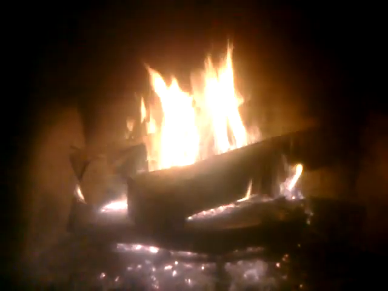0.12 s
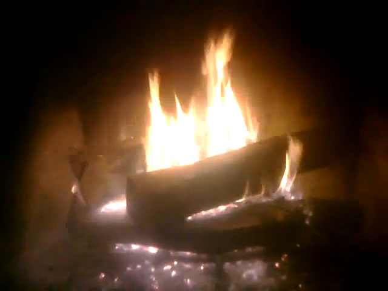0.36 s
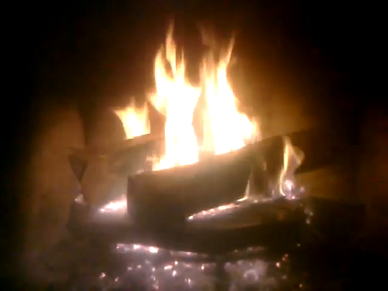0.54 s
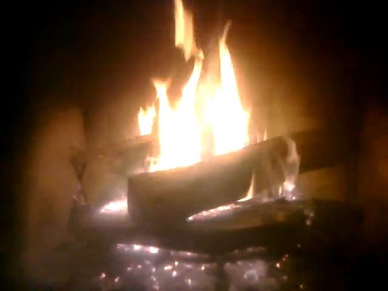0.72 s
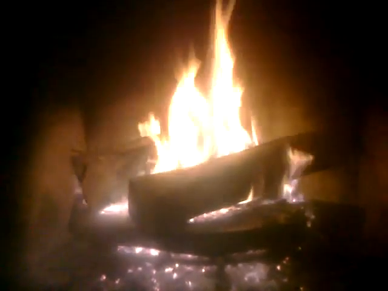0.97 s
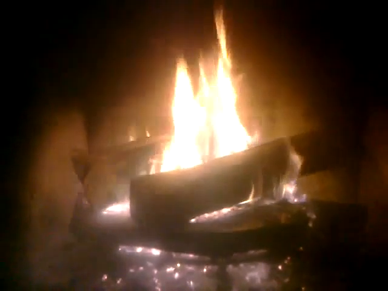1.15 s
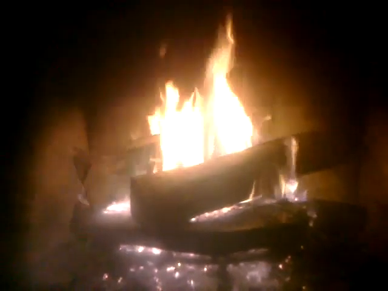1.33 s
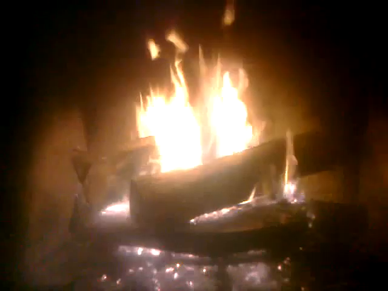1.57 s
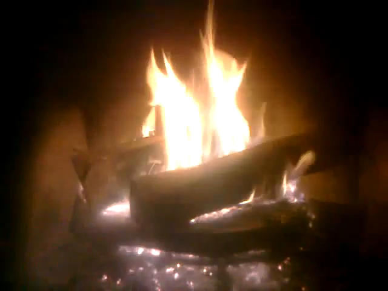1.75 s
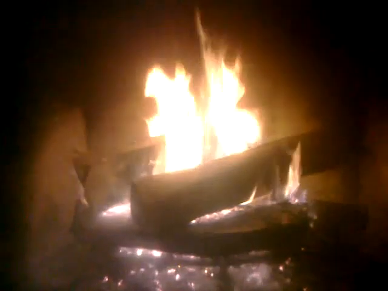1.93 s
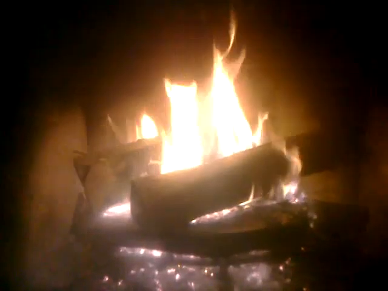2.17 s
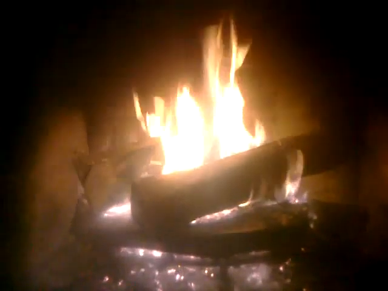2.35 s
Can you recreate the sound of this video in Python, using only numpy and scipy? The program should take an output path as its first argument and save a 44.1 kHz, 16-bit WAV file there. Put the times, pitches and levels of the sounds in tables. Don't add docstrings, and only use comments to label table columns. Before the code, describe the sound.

A wood fire crackles: a loud early snap over soft hissing flames, later small dull knocks.

```python
import sys
import numpy as np
from scipy import signal
from scipy.fft import rfft, irfft
from scipy.io import wavfile
from scipy.ndimage import uniform_filter1d

SR = 44100
rng = np.random.default_rng(int(sys.argv[2]) if len(sys.argv) > 2 else 0)


def voltage_ratio(decibels):
    exponent = np.asarray(decibels, float) / 20
    return 10 ** exponent


def int16_out(signal):
    q = np.round(np.clip(np.atleast_2d(signal).T, -1, 1) * 32767)
    wavfile.write(sys.argv[1], SR, q.astype(np.int16))


N = 105840


def read(points, hz):
    f, value = np.transpose(points)
    return np.interp(np.log(hz + 1), np.log(f + 1), value)


def evened(x):
    return x / np.sqrt(np.mean(x ** 2) + 1e-20)


def add(mix, s, sound):
    part = mix[round(s * SR):][:len(sound)]
    part += sound[:len(part)]


def bin_hz(size=8192):
    return np.fft.rfftfreq(size, 1 / SR)


def bumps(table):
    return sum(db * np.exp(-.5 * (np.log2((bin_hz() + 1) / hz) / w) ** 2) for hz, w, db in table)


def causal(db):
    log = np.log(voltage_ratio(np.maximum(db, -100)))
    full = np.concatenate([log, log[-2:0:-1]])
    return np.fft.ifft(np.exp(np.conj(signal.hilbert(full)))).real[:4096]


def shaped(tone):
    spectrum = rfft(rng.standard_normal(N))
    return evened(irfft(spectrum * voltage_ratio(read(tone, bin_hz(N))), N))


def flames():
    # (frequency [Hz], level [dB])
    flutter_tone = [(15, -26), (30, -13), (56, 2), (72, -6.5), (105, -1.5), (135, -9.5), (165, -18.5),
                    (300, -40.5)]
    # (time [s], level [dB])
    vigour = [(0.0, -64), (0.07, -57), (0.1, -59), (0.4, -54), (0.59, -65.5), (0.61, -62.5), (0.78, -63),
              (0.8, -55.5), (0.98, -62), (1.18, -53.5), (1.2, -60), (1.47, -54), (1.55, -59.5), (1.58, -53),
              (1.72, -67), (1.74, -56.5), (2.23, -60), (2.4, -52)]
    level_db, follow, steady = -58, 0.84, 0.74
    s, db = np.transpose(vigour)
    roar = shaped(flutter_tone)
    own_power = uniform_filter1d(uniform_filter1d(roar ** 2, size=2500), size=2500)
    surge_db = np.interp(np.arange(N) / SR, s, db - db.mean())
    return voltage_ratio(level_db + follow * surge_db) * roar / own_power ** (steady / 2)


def escaping_gas():
    # (frequency [Hz], level [dB])
    hiss_tone = [(20, -2), (170, 7.5), (400, 4), (700, -2.5), (1500, -3.5), (4000, -3), (9000, -8.5),
                 (16000, -23)]
    level_db, patch_db, flicker_db = -61.5, 1.0, 0.3
    hz, t, z = signal.stft(shaped(hiss_tone), SR, nperseg=512, noverlap=384)
    patches = uniform_filter1d(rng.standard_normal(z.shape), size=6, axis=0)
    patches = evened(uniform_filter1d(patches, size=20, axis=1))
    flicker = evened(uniform_filter1d(rng.standard_normal(len(t)), size=4))
    z = z * voltage_ratio(patch_db * patches + flicker_db * flicker)
    return voltage_ratio(level_db) * signal.istft(z, SR, nperseg=512, noverlap=384)[1][:N]


def sizzle():
    per_s, spread_db, level_db = 1500, 2.5, -78.5
    sizes = voltage_ratio(spread_db * np.minimum(rng.exponential(size=N), 4))
    grains = sizes * (rng.random(N) < per_s / SR) * rng.choice([-1, 1], N)
    return voltage_ratio(level_db) * evened(signal.lfilter([1, 1, -1, -1], [1], grains))


def hiss():
    both = escaping_gas() + sizzle()
    return irfft(rfft(both) * (bin_hz(N) < 15900), N)


def cracks():
    # (time [s], level [dB], tearing length [s], centre [Hz], fall one octave away [dB])
    splits = [(0.2395, -18.5, 0.0026, 5500, 1), (0.2429, -29.5, 0.0035, 5000, 0.9),
              (0.2471, -37.5, 0.0041, 3000, 2), (0.2695, -38, .0024, 8000, 0),
              (0.2732, -46, 0.0022, 6000, 6), (0.2769, -36, 0.0014, 5000, 2.5),
              (0.2795, -45, .003, 4000, -1), (0.285, -55.5, .012, 1500, 1),
              (0.2525, -44.5, 0.0059, 2500, 3), (0.943, -46, 0.0031, 8000, 1),
              (.9795, -47.5, 0.0019, 3800, 7), (0.983, -46.5, 0.0035, 3000, 6.5),
              (1.348, -54, 0.005, 1500, 6), (1.356, -53, 0.0071, 2800, 3.5),
              (1.399, -52.5, 0.0046, 4600, 12), (1.189, -51.5, 0.0046, 2500, 4)]
    # (frequency [Hz], level [dB])
    snap_tone = [(100, -41), (500, -2), (1200, -9.5), (2000, 5.5), (3800, 3.5), (6800, -1.5), (9000, -2.5),
                 (16000, -8.5)]
    # (frequency [Hz], width [octaves], level [dB])
    pocket = [(2870, 0.073, -8.5), (3910, .1, 4), (5000, .08, 5.5), (6000, .04, 2), (6620, 0.042, -5),
              (7250, .04, 3.5), (8830, 0.065, 3), (9440, 0.018, -5)]
    rise_s, spread_db = 0.00045, 1
    out, hz, t = np.zeros(N), bin_hz(), np.arange(600) / SR
    signs = rng.choice([-1., 1.], (len(splits), 600))
    sizes = rng.exponential(size=(len(splits), 600))
    for (s, db, length, centre_hz, fall_db), sign, size in zip(splits, signs, sizes):
        envelope = np.minimum(t / rise_s, 1) / (1 + (t / length) ** 12)
        run = envelope * sign * voltage_ratio(spread_db * size)
        own_db = 10 * np.log10(uniform_filter1d(abs(rfft(run, n=8192)) ** 2, size=130))
        tone_db = read(snap_tone, hz) + bumps(pocket)
        tone_db -= abs(fall_db) * np.log2((hz + 100) / centre_hz) ** 2
        snaps = np.convolve(run, causal(tone_db - own_db + own_db.mean()))
        add(out, s, voltage_ratio(db - 6) * snaps * np.sqrt(length * SR) / np.linalg.norm(snaps))
    return out


def log_ring():
    # (frequency [Hz], level [dB], t60 [s])
    modes = [(248, -7, 0.033), (370, -2.5, 0.049), (480, -5.5, .03), (584, -8.5, 0.037), (750, -7.5, 0.055),
             (929, -4, 0.068), (1080, -11, .03), (1200, -0.5, .03), (1515, -4.5, .03), (1640, -10, 0.035),
             (1814, -0.5, 0.026), (2130, -1, .025), (2350, -8, 0.022)]
    strike_s, level_db, rise_s = 0.2415, -35, 0.0022
    out, t, ring = np.zeros(N), np.arange(4000) / SR, 0
    for k, (hz, db, t60) in enumerate(modes):
        ring = ring + (-1) ** k * voltage_ratio(db - 60 * t / t60) * np.sin(2 * np.pi * hz * t)
    add(out, strike_s, voltage_ratio(level_db) * np.minimum(t / rise_s, 1) * ring)
    return out


def tail(t60, start_s):
    t = np.arange(SR // 2) / SR
    taps = rng.standard_normal(len(t)) * voltage_ratio(-60 * t / t60) * np.clip(t / start_s - 1, 0, 1)
    return taps / np.linalg.norm(taps)


def echoes(dry):
    firebox = voltage_ratio(-16) * tail(0.04, 0.0022)
    room = voltage_ratio(-21) * tail(0.47, 0.016)
    return signal.fftconvolve(dry, firebox + room)[:N]


def knocks():
    # (time [s], level [dB], centre [Hz], t60 [s])
    scuffs = [(.981, -59, 2200, .06), (.99, -61, 800, .1), (1.04, -66, 1200, 0.16), (1.185, -60, 500, 0.09),
              (1.195, -60, 1140, 0.17), (1.27, -61.5, 910, 0.16), (1.348, -60, 546, 0.22),
              (1.349, -55, 1500, 0.17), (1.385, -59.5, 580, 0.3), (1.39, -62, 1600, 0.18),
              (1.42, -63, 1390, 0.17), (1.53, -79, 1300, .1), (2.38, -63, 900, .15),
              (.275, -54.5, 1090, 0.17)]
    # (time [s], level [dB], frequency [Hz], t60 [s])
    pings = [
        (.984, -56, 1690, .13),
        (.988, -60, 880, .15),
        (1.352, -58, 1090, .15),
        (1.35, -61, 560, .2),
        (1.40, -61, 1460, .2),
    ]
    width, rise_s = 0.43, 0.0017
    out, t = np.zeros(N), np.arange(8192) / SR
    rise = np.minimum(t / rise_s, 1)
    for (s, db, hz, t60), noise in zip(scuffs, rng.standard_normal((len(scuffs), 8192))):
        band = irfft(rfft(noise) * np.exp(-(np.log((bin_hz() + 1) / hz) / width) ** 2))
        add(out, s, voltage_ratio(db - 60 * t / t60) * rise * evened(band))
    for s, db, hz, t60 in pings:
        add(out, s, voltage_ratio(db - 60 * t / t60) * rise * np.sin(2 * np.pi * hz * t))
    return out


def rustle():
    # (time [s], level [dB])
    swell = [
        (.7, -82.5),
        (.97, -64.5),
        (1.1, -66),
        (1.34, -64.5),
        (1.352, -58),
        (1.45, -65),
        (1.55, -67),
        (1.65, -92),
    ]
    # (frequency [Hz], level [dB])
    scrape_tone = [(150, -28), (400, -5.5), (600, -4), (1200, -2.5), (1900, -5), (3000, -9.5), (5500, -14),
                   (10000, -40)]
    s, db = np.transpose(swell)
    return voltage_ratio(np.interp(np.arange(N) / SR, s, db, -120, -120)) * shaped(scrape_tone)


def whistle():
    # (start [s], frequency [Hz], level [dB])
    s, hz, db = (2.05, 5050, -79)
    t = np.arange(N) / SR
    wander = 2 * np.cumsum(rng.standard_normal(N)) / np.sqrt(SR)
    return voltage_ratio(db) * np.clip(10 * (t - s), 0, 1) * np.sin(2 * np.pi * hz * t + wander)


def scene():
    fire = flames() + hiss()
    burst = cracks() + log_ring()
    settling = knocks() + rustle()
    return (fire + burst + echoes(burst) + settling + whistle())[None]


def roll_off(x):
    return signal.sosfilt(signal.butter(12, 17000, fs=SR, output="sos"), x)


def record(dry):
    # (frequency [Hz], width [octaves], level [dB])
    port = [(1804, 0.17, 1.5), (2500, 0.19, -5), (3154, 0.087, 4.5), (5000, 0.29, -3.5), (6590, 0.22, 10.5),
            (8240, 0.31, 6), (11540, 0.33, -1.5)]
    hz = bin_hz()
    response_db = bumps(port) - 8 * np.log2(np.maximum(hz / 9500, 1))
    response_db -= 60 * np.clip((hz - 16700) / 400, 0, 1)
    mix = signal.fftconvolve(dry, causal(response_db)[None])[:, :N]
    return roll_off(mix)


dry = scene()
out = record(dry)
int16_out(out)
```